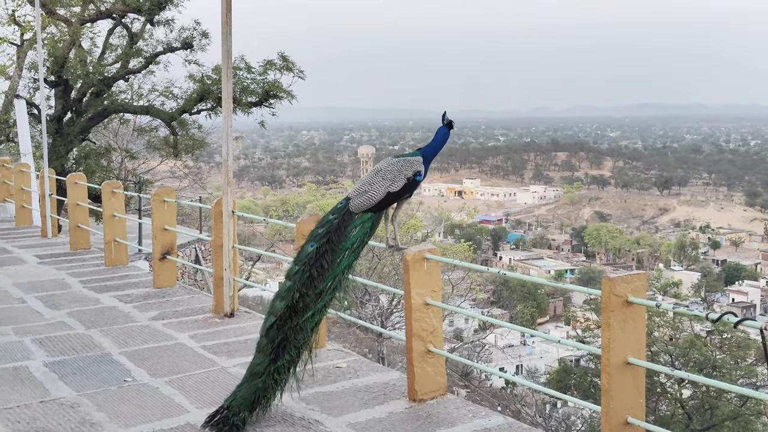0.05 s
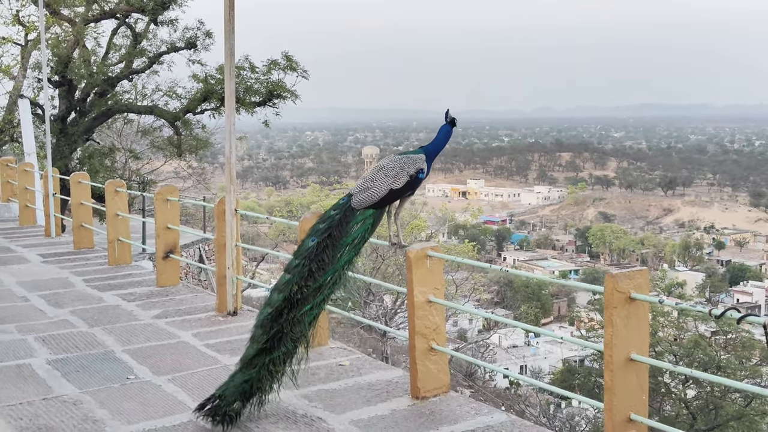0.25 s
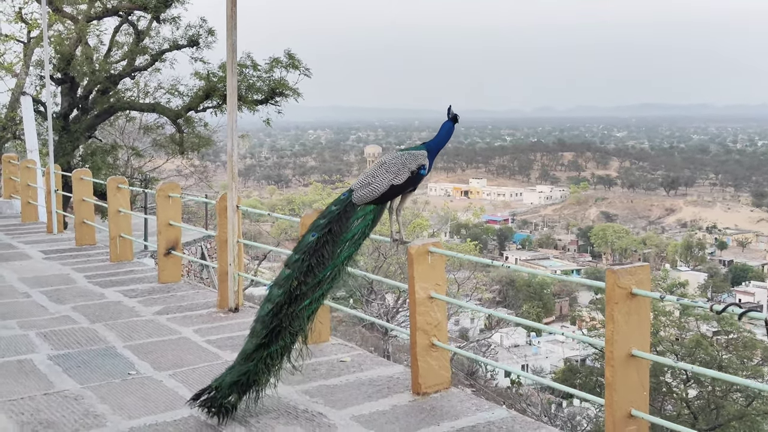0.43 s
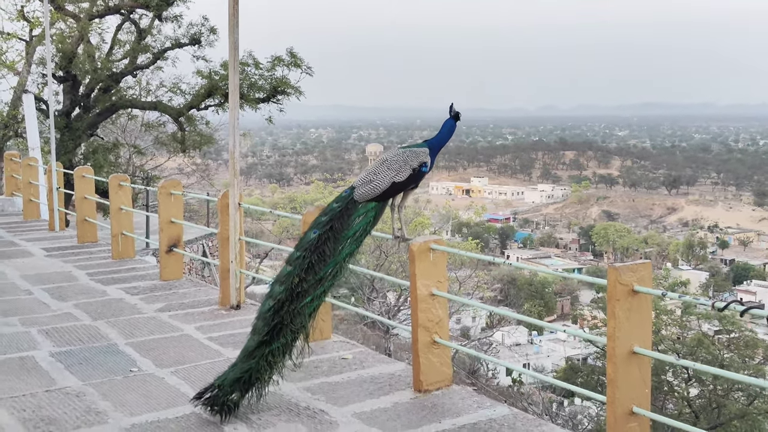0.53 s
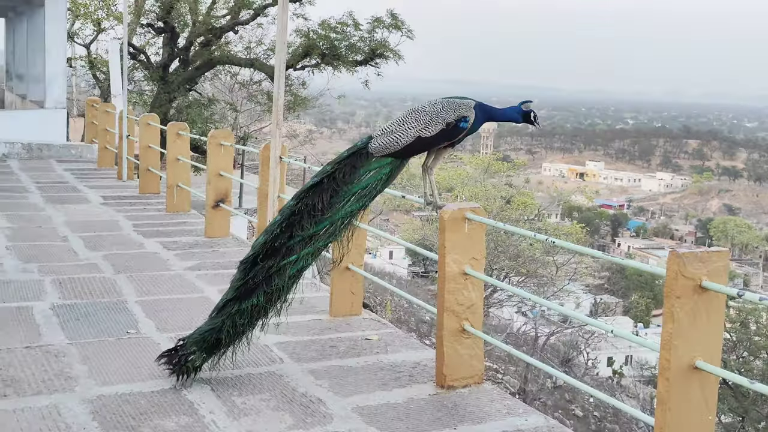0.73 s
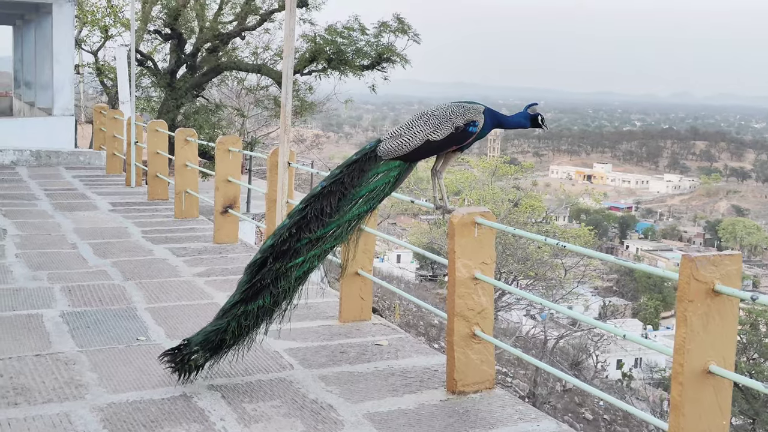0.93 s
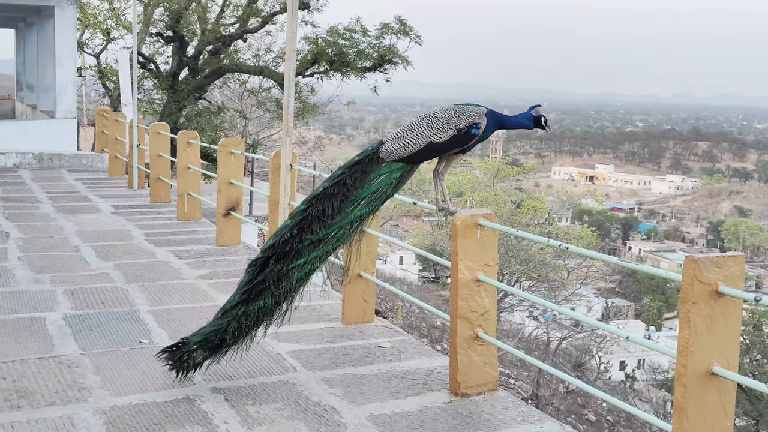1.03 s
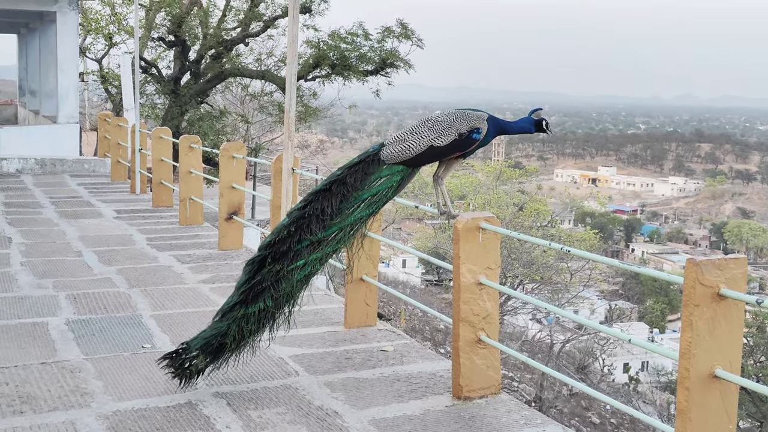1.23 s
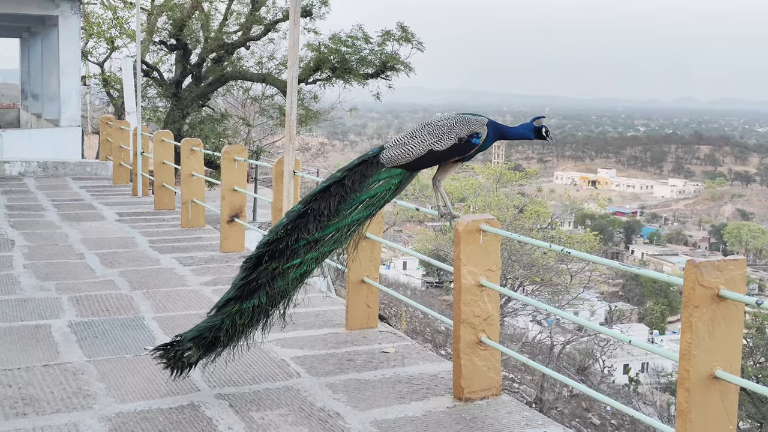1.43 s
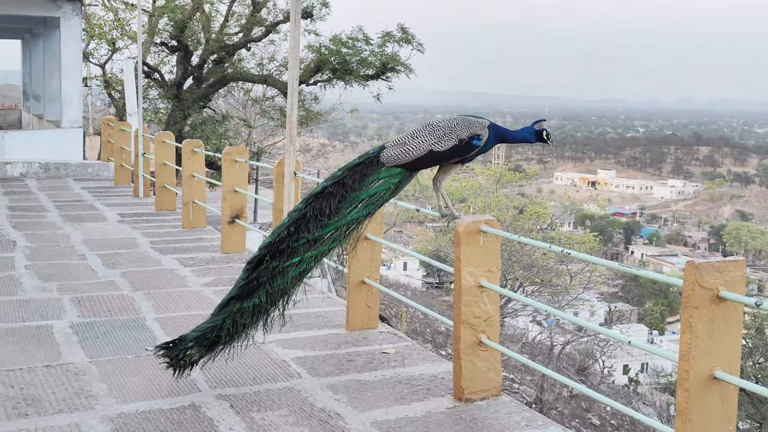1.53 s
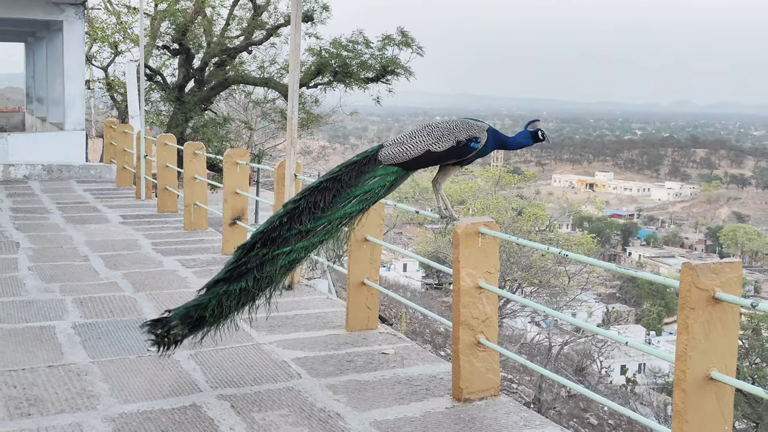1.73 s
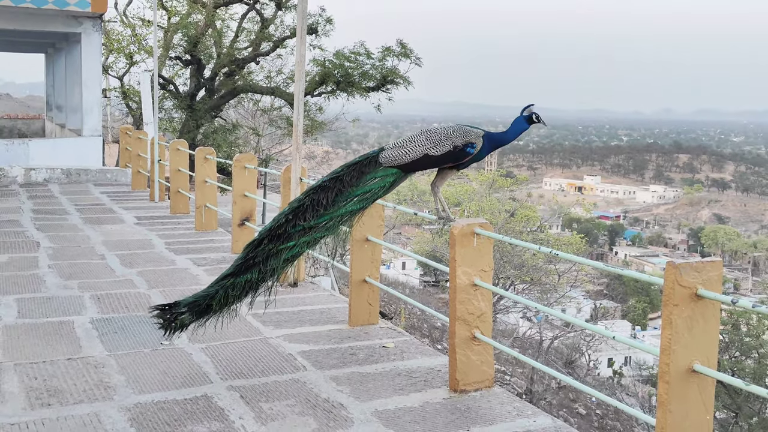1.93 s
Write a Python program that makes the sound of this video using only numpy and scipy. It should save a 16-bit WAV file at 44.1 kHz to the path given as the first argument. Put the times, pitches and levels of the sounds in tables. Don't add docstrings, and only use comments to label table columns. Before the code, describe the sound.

A peacock calls loudly and close on an open terrace. After a faint bird whistle, a short rough cluck at 0.2 seconds leads into a fluttering, nasal honk that sinks until 0.8. Echo fades; at 1.15 a second call scoops up, holds higher and clearer, then falls by 1.75. Leaf and insect hiss, low rumble and distant town dip under the calls; a faint bird whistles near 1.9.

```python
import sys
import numpy as np
from scipy import signal
from scipy.io import wavfile
from scipy.ndimage import uniform_filter1d, minimum_filter1d

SR = 44100
rng = np.random.default_rng(int(sys.argv[2]) if len(sys.argv) > 2 else 0)


def makeup_ratio(level_db):
    decades = np.asarray(level_db, float) / 20
    return 10 ** decades


def unload_wav(signal):
    wavfile.write(
        sys.argv[1],
        SR,
        np.round(np.clip(np.atleast_2d(signal).T, -1, 1) * 32767).astype(np.int16),
    )


N = 88200


def evened(x):
    return x / np.sqrt(np.mean(x ** 2) + 1e-20)


def read(points, hz):
    f, value = np.transpose(points)
    return np.interp(np.log(hz + 1), np.log(f + 1), value)


def columns(table, t):
    rows = np.transpose(table)
    return [np.interp(t, rows[0], c) for c in rows[1:]]


def add(mix, s, sound):
    part = mix[round(s * SR):][:len(sound)]
    part += sound[:len(part)]


def wander(count, seconds):
    size = max(round(seconds * SR), 1)
    return evened(uniform_filter1d(uniform_filter1d(rng.standard_normal(count), size), size))


def hump(hz, centre_hz, width_hz):
    return 1 / (1 + 2j * (hz - centre_hz) / width_hz) ** 2


def noise(spectrum_db):
    a, b, patches = rng.standard_normal((N // 256 + 5, 513, 3)).T
    patches = uniform_filter1d(patches, size=10, axis=0)
    patches = evened(uniform_filter1d(patches, size=12, axis=1))
    spectra = (a + 1j * b) * makeup_ratio(spectrum_db[:, None] + 1.3 * patches)
    return evened(signal.istft(spectra, nperseg=1024, noverlap=768)[1][:N])


def background():
    # [f/Hz, level per Hz/dB]
    hiss_spectrum = [(120, -46), (200, -9), (939, -4.5), (1160, 0.5), (1540, -5), (2100, 2), (2560, -8),
                     (8100, -3.5), (10200, -5.5), (13300, -49), (22000, -120)]
    rumble_spectrum = [(12, -46), (20, -19), (59, 3), (113, -8.5), (178, -10.5), (300, -11.5), (390, -32),
                       (660, -120)]
    town_spectrum = [(250, -8), (550, 4.5), (1000, -19), (1600, 7.5), (2200, 3), (2900, 4.5), (3400, -5),
                     (6000, -35)]
    # [t/s, gain/dB]
    duck = [(0, 2.5), (.27, 3.5), (.33, -4.5), (.8, -20.5), (1.1, -16.5), (1.3, -14), (1.75, -23.5),
            (2, -21)]
    hz = np.fft.rfftfreq(1024, 1 / SR)
    duck_db = columns(duck, np.arange(N) / SR)[0]

    edge_hz, above_edge_db = 10400, -16
    edge_db = above_edge_db / (1 + np.exp((edge_hz - hz) / 120))
    hiss = noise(read(hiss_spectrum, np.minimum(hz, edge_hz)) + edge_db - 30 * (hz < 200))
    rumble = noise(read(rumble_spectrum, hz) - 60 * (hz > 300))
    town = noise(read(town_spectrum, hz) - 30 * (hz < 250))

    out = makeup_ratio(-41.5 + 0.55 * duck_db) * town
    out += makeup_ratio(-30 + duck_db) * hiss
    return out + makeup_ratio(-50.5 + 0.46 * duck_db) * rumble


def far_bird(start, length, from_hz, to_hz, level_db):
    t = np.arange(0, length, 1 / SR)
    glide_hz = from_hz + (to_hz - from_hz) * (t / length) ** 2
    hz = glide_hz * (1 + 0.0052 * wander(len(t), 0.026))
    level = makeup_ratio(level_db + 2 * wander(len(t), 0.0083))
    swell = np.sin(np.pi * t / length * .9) ** .5
    return start, level * swell * np.sin(2 * np.pi * np.cumsum(hz) / SR)


def terrace(x):
    # [delay/s, level/dB]
    early = [(.0021, -20), (.0063, -14)]
    # [f/Hz, t60/s]
    tail = [(300, 1.28), (1250, 0.74), (1750, 0.75), (2400, 0.78), (5000, 0.69), (10000, 0.36)]
    far_db, near_db, near_t60_s = -18, -9, .3
    count = 2 * SR
    taps = np.zeros((2, count))
    at = np.arange(600, count - 20, 20) + rng.integers(0, 20, (2, (count - 601) // 20))
    np.put_along_axis(taps, at, rng.choice([-1., 1.], at.shape), 1)

    hz, t, z = signal.stft(taps[0], SR, nperseg=256)
    far = signal.istft(z * makeup_ratio(-60 * t / read(tail, hz)[:, None]), SR, nperseg=256)[1][:count]
    near = signal.lfilter([1, -.75], [1], taps[1]) * makeup_ratio(-60 * np.arange(count) / SR / near_t60_s)
    reply = makeup_ratio(far_db) * far / np.linalg.norm(far) + makeup_ratio(near_db) * near / np.linalg.norm(near)
    reply = signal.sosfilt(signal.butter(2, 1000, "high", fs=SR, output="sos"), reply)
    for delay, db in early:
        reply[round(delay * SR)] += makeup_ratio(db)

    duck_share, knee_db = .55, -24
    loud_db = 10 * np.log10(abs(uniform_filter1d(x ** 2, size=900)) + 1e-9)
    duck = makeup_ratio(-duck_share * np.maximum(loud_db - knee_db, 0))
    return x + signal.fftconvolve(x, reply)[:N] * duck


def cluck(start, length, hz, level_db):
    partials_db = [-4, -1, 0, -9, -15, -18, -16, -19, -22]
    rise_s, after = .003, .14
    t = np.arange(0, 3 * length, 1 / SR)
    shape = np.minimum(t / rise_s, 1) * np.where(t < length, 1, after * np.exp(-(t - length) / length))
    stack = np.zeros(len(t))
    for k, db in enumerate(partials_db, 1):
        rough = 1 + 0.49 * wander(len(t), 0.0019)
        stack += makeup_ratio(db) * rough * np.cos(2 * np.pi * (k * hz * t + rng.random()))
    return start, makeup_ratio(level_db) * shape * evened(stack)


def call(voice, tract, upper_tract, flutter, fray):
    # [f/Hz, level/dB]
    upper_partials = [(1500, 6), (3000, -2.5), (4400, 4), (6000, -1.5), (7500, -9.5), (10000, -15),
                      (13000, -26), (15000, -50)]
    # [t/s, length/s, partial number, level/dB]
    dropouts = [(1.535, .012, 3, -22), (1.545, .03, 5, -14), (1.345, .02, 3, -12), (.475, .015, 3, -10),
                (.55, .02, 6, -10)]
    start, end = voice[0][0], voice[-1][0]
    t = np.arange(start, end, 1 / SR)
    count = len(t)
    hz, effort_db = columns(voice, t)
    hz = uniform_filter1d(hz, size=350, mode="nearest")
    throat_hz, beak_hz, beak_db, chest_db, bright_db, breath_db = columns(tract, t)
    cavity_hz, cavity_db, tip_hz, tip_db = columns(upper_tract, t)
    fray = columns(fray, t)[0]

    first, rate, slowing, deep, shallow, least = flutter
    lag = .6 * np.clip((t - start) / .07 - .5, 0, 1)
    depth = np.clip(shallow + (deep - shallow) * np.exp(-(t - start) / .16), 0, 1)
    beat = 2 * np.pi * (rate * (t - first) - .5 * slowing * (t - first) ** 2)
    jitter = 0.0037 * 2 * fray * wander(count, 0.0057)
    turns = np.cumsum(hz * (1 + jitter + .002 * depth * np.sin(beat))) / SR

    out, power = np.zeros(count), np.zeros(count)
    for k in range(1, 25):
        f = k * hz
        beak = hump(f, beak_hz, 780)
        gain = hump(f, throat_hz, 320)
        gain = gain + makeup_ratio(beak_db) * abs(beak) * (beak / abs(beak)) ** .45
        gain += makeup_ratio(cavity_db) * hump(f, cavity_hz, 600)
        gain += makeup_ratio(tip_db) * hump(f, tip_hz, 1700)
        if k == 1:
            gain += makeup_ratio(chest_db)
        else:
            gain -= 1j * makeup_ratio(bright_db + read(upper_partials, f))
        gain *= f < .45 * SR
        power += abs(gain) ** 2 / 2

        shimmer = makeup_ratio(2.2 * min((k - 1) / 4, 1) ** 2 * wander(count, 0.024))
        breath = np.minimum(makeup_ratio(breath_db) * k ** 1.82 / 6 * makeup_ratio(9), 1.2)
        air = breath * (wander(count, 0.00075) + 1j * wander(count, 0.0016))

        if k == 1:
            pulse_depth = 0.34 * depth
        elif k < 4:
            pulse_depth = depth
        else:
            pulse_depth = np.maximum(depth, least) * rng.uniform(0.087, 1.43)
        pulse = 1 + pulse_depth * np.cos(beat - lag * max(k - 2, 0))

        share, fine_share = fray * np.clip((k - 2.6) / 11, 0, 1), .55
        coarse = wander(count, .004) + 1j * wander(count, .004)
        fine = wander(count, .0007) + 1j * wander(count, .0007)
        rasp = ((1 - fine_share ** 2) * coarse + fine_share * fine) / np.sqrt(2)

        ripple_db = 3.2 * fray * (k > 1) * wander(count, .005)
        for s, length, partial, db in dropouts:
            if partial == k:
                ripple_db = ripple_db + db * np.exp(-((t - s) / length) ** 2)
        tone = shimmer * np.sqrt(1 - share ** 2) + share * rasp + air
        out -= (gain * makeup_ratio(ripple_db) * pulse * tone * np.exp(2j * np.pi * k * turns)).real

    rise_s, release_s = 0.0015, 0.011
    edges = np.clip(np.minimum((t - start) / rise_s, (end - t) / release_s), 0, 1)
    return start, edges * makeup_ratio(effort_db) * out / np.sqrt(power)


def scene():
    # [t/s, f/Hz, level/dB]
    voice = [
        [(0.224, 631, -17.5), (0.248, 592, -11.5), (0.264, 643.4, -5), (0.31, 696.4, -8), (0.442, 697.5, -6.5),
         (0.644, 648.1, -5.5), (0.75, 601.2, -12), (0.774, 576, -27), (0.782, 594, -13)],
        [(1.137, 610, -51), (1.147, 629, -20.5), (1.161, 674.5, -13.5), (1.177, 702.5, -11),
         (1.201, 716.3, -12), (1.245, 700.6, -11.5), (1.263, 716.3, -5), (1.281, 793.4, -11),
         (1.295, 812.6, -7)],
        [(1.325, 839.5, -0.5), (1.345, 847.8, -4.5), (1.4, 869.4, -7), (1.498, 868, -8.5), (1.548, 853.6, -11),
         (1.636, 805.5, -16), (1.724, 730, -17.5), (1.742, 688.5, -19.5), (1.75, 630, -38)],
    ]
    # [t/s, throat/Hz, beak/Hz, beak/dB, chest/dB, brightness/dB, breath/dB]
    tract = [
        [(.22, 1210, 4280, -12, 2, -44, -3.5), (.27, 1373, 3560, -21, 3, -20.5, -30.5),
         (.3, 1333, 3420, -8.5, -2, -19.5, -32), (.42, 1410, 3800, -26, -10.5, -22, -70),
         (.52, 1295, 6030, -22.5, -12.5, -24.5, -57), (.63, 1300, 3108, -21, -14.5, -30, -68),
         (.75, 1210, 2800, -22, -16, -34.5, -45), (.78, 1220, 2860, -4, -6.5, -21.5, -38)],
        [(1.13, 1250, 2150, 2, -6, -37, -4), (1.2, 1370, 2430, 5, -5, -17.5, -61),
         (1.25, 1390, 2260, 10.5, -3, -16.5, -43), (1.275, 1595, 2310, -4, -8.5, -23, -36.5),
         (1.32, 1510, 3080, -24.5, -20.5, -34, -39.5), (1.52, 1831, 3390, -21, -15.5, -31.5, -83),
         (1.56, 1810, 3110, -4.5, -18.5, -44, -69), (1.65, 1653, 2370, 6.5, -4.5, -8, -79),
         (1.75, 1474, 2443, 11.5, -2, -18.5, -15)],
    ]
    # [t/s, cavity/Hz, cavity/dB, tip/Hz, tip/dB]
    upper_tract = [
        [(.22, 4360, -35, 11500, -38), (.275, 3930, -45, 11700, -35), (.29, 5400, -25, 11800, -26),
         (.35, 7080, -12.5, 10950, -19), (.44, 6950, -20.5, 10900, -28.5), (.475, 4800, -11.5, 9200, -36),
         (.51, 5740, -11, 8400, -41), (.62, 6435, -27, 8600, -63), (.79, 6100, -51, 8800, -43)],
        [(1.13, 5680, -19, 11800, -66), (1.2, 5820, -5.5, 11700, -34), (1.258, 5910, -3.5, 11400, -42),
         (1.277, 5100, -21, 11000, -33.5), (1.31, 6020, -24, 12000, -56.5), (1.52, 6270, -17, 8460, -31.5),
         (1.56, 7680, -26.5, 11650, -28), (1.66, 6250, -28, 10400, -19), (1.75, 5570, -25, 9400, -57)],
    ]
    # [first beat/s, beats per s/Hz, slowing/(Hz/s), depth at start/0-1, at end/0-1,
    # least depth in upper partials/0-1]
    flutter = [
        (.2318, 54.6, 6, .8, .13, .48),
        (1.212, 24, 0, .15, .02, .15),
    ]
    # [t/s, share/0-1]
    fray = [
        [(.22, .9), (.275, .7), (.31, .3), (.47, .25), (.56, .4), (.66, .75), (.79, 1)],
        [(1.13, .8), (1.175, .35), (1.258, .3), (1.272, 1), (1.3, .7), (1.33, .15), (1.53, .15), (1.6, .6),
         (1.75, .85)],
    ]
    # [t/s, length/s, from f/Hz, to f/Hz, level/dB]
    far_birds = [(.11, .085, 2030, 2100, -38), (.93, .07, 450, 500, -58), (1.11, .03, 2400, 2300, -50),
                 (1.9, .11, 1480, 1900, -45), (.925, .09, 2050, 2250, -51), (.755, .03, 6400, 6400, -50)]

    bird = np.zeros(N)
    add(bird, *cluck(start=.1962, length=.0095, hz=584, level_db=-10.5))
    voices = [voice[0], list(voice[1]) + list(voice[2])]
    for parts in zip(voices, tract, upper_tract, flutter, fray):
        add(bird, *call(*parts))
    out = terrace(bird) + background()
    for row in far_birds:
        add(out, *far_bird(*row))
    return np.tile(out, (2, 1))


def top_cut(x):
    return signal.sosfilt(signal.butter(12, 15450, fs=SR, output="sos"), x)


def record(dry):
    # [t/s, gain/dB]
    snatch = [(.287, -3), (.381, -1.2), (.401, -1.6), (.573, -1.2), (.632, -1), (1.3, -1.5), (1.318, -2),
              (1.331, -3.2)]
    recovery_s, fall_s = .04, .0006
    t = np.arange(N) / SR
    cut_db = np.zeros(N)
    for s, db in snatch:
        cut_db += db * (t >= s) * np.exp(-np.maximum(t - s, 0) / recovery_s)
    x = dry * makeup_ratio(uniform_filter1d(cut_db, size=round(fall_s * SR)))

    knee, hold = 1.06, round(.003 * SR)
    gain = np.minimum(knee / (abs(x) + 1e-9), 1)
    x = x * uniform_filter1d(minimum_filter1d(gain, size=2 * hold), size=hold)
    x = signal.sosfilt(signal.butter(2, 22, "high", fs=SR, output="sos"), x)
    return top_cut(np.clip(x, -1, 1))


dry = scene()
out = record(dry)
unload_wav(out)
```